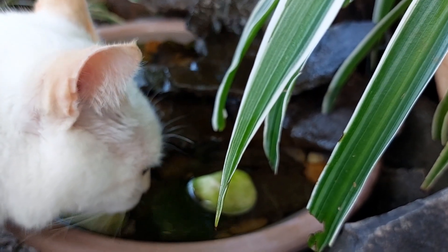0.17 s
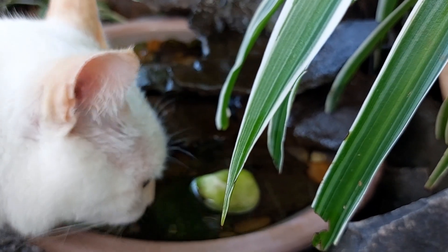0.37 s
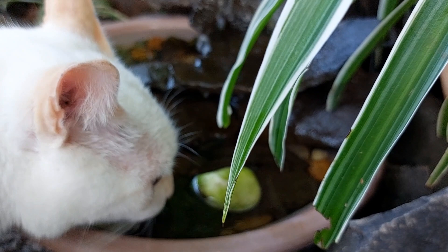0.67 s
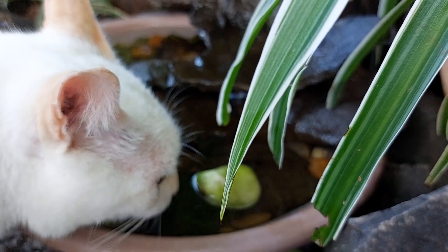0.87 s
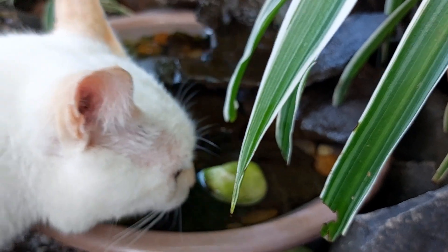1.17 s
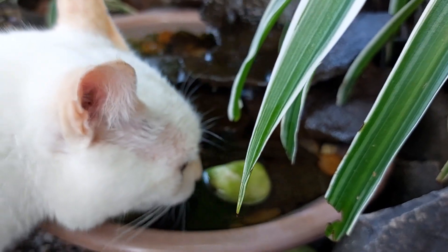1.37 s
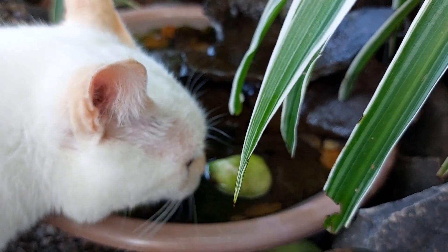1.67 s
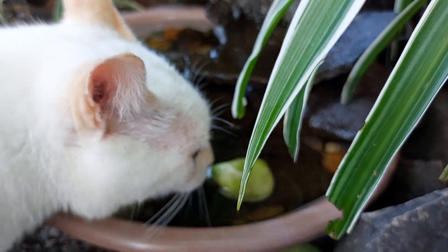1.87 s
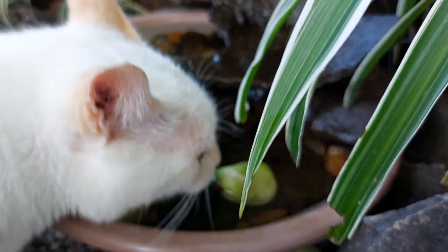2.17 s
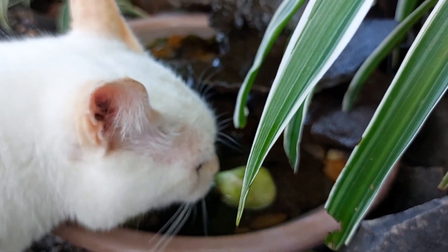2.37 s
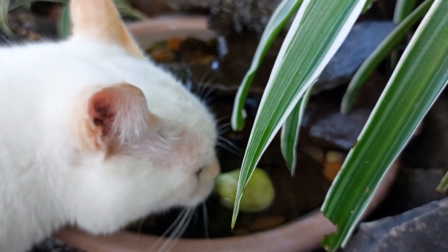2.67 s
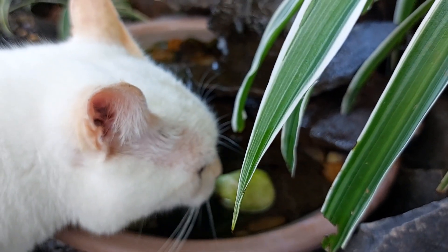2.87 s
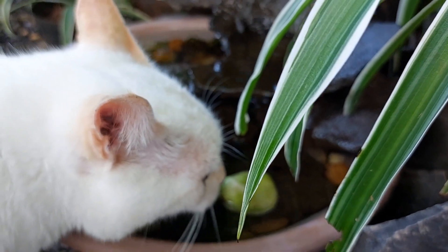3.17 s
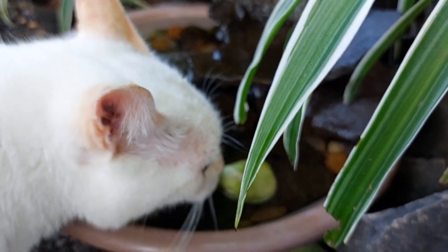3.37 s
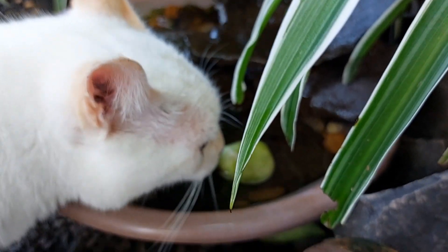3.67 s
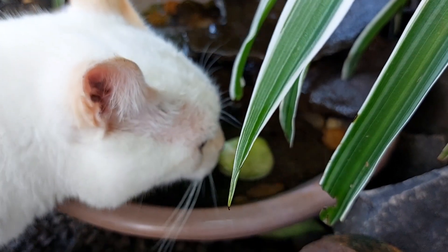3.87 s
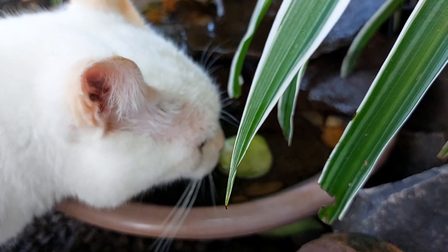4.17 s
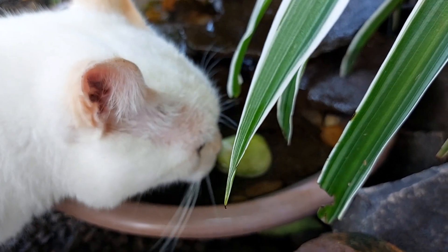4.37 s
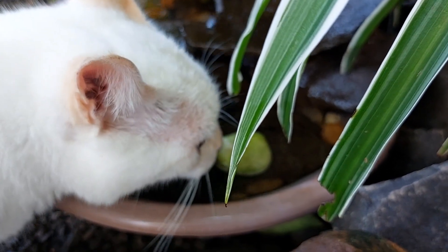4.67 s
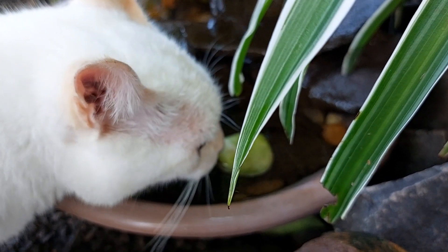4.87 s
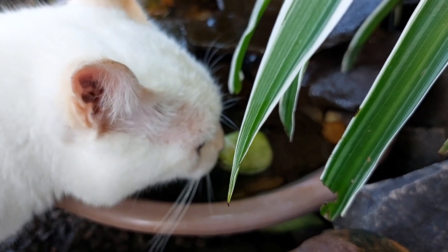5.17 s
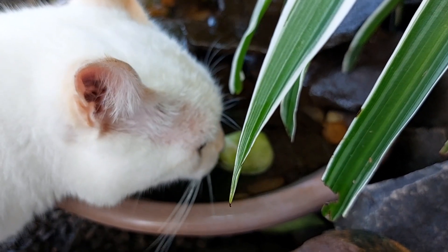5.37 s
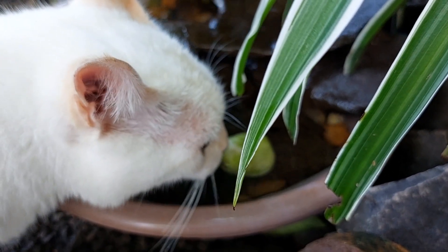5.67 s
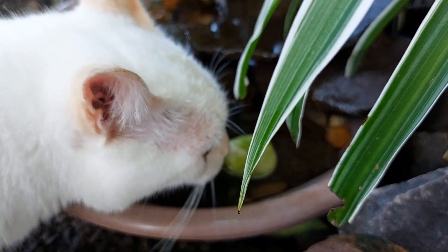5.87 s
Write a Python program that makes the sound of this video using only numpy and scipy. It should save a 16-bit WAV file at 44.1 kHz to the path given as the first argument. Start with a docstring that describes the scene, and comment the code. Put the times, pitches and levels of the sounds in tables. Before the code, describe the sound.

A cat drinks from a small garden pond, close to the right of a hand-held stereo microphone. Its tongue makes irregular, high wet clicks and tiny bubble pops, with one larger drip early on and soft smacks later. A bird faintly repeats a falling whistle. The microphone is bumped softly a few times past the middle. Distant traffic rumbles throughout, with tyres and an engine swelling near the end.

```python
"""A cat laps at a garden pond, close to the right of a hand-held stereo microphone; far traffic rumbles.
From the start each touch of the tongue pops small bubbles and spits spray; birds twitter faintly.
From 0.4 s one bird repeats a falling whistle. At 1.3 s a large drop falls back; at 1.9 s tyres hum past.
From 2.8 s come wet smacks, later dull knocks too. The casing is bumped around 3.5 s and at 4.7 s.
Tyre roar and an engine swell to their peak near 5.4 s."""
import sys
import numpy as np
from scipy import signal
from scipy.io import wavfile
from scipy.ndimage import uniform_filter1d

SR = 44100
rng = np.random.default_rng(int(sys.argv[2]) if len(sys.argv) > 2 else 0)


def file_out(sig):
    """Save sig as 16-bit WAV at sys.argv[1]."""
    # one column per channel
    cols = np.atleast_2d(sig).T
    # limit, then scale
    lim = np.clip(cols, -1, 1)
    pcm = np.round(lim * 32767).astype(np.int16)
    wavfile.write(sys.argv[1], SR, pcm)


N = 264952


def click(db, hz, spray_db, plop_db):
    """A bubble rings, rising slightly, with a snap, spray and a low plop; a wet tail follows."""
    t, white = np.arange(2600) / SR, rng.standard_normal(2600)
    onset = 1 - np.exp(-(t / 0.0006) ** 2)
    ring_t60_s = 0.004 + 0.02 * (2200 / hz) ** 3
    glide = 1 + 0.06 * np.minimum(t / ring_t60_s, 1)
    bubble = np.sin(2 * np.pi * hz * t * glide) * decay(t, ring_t60_s)
    wet = band(white, min(hz * 0.85, 13000), min(hz * 1.12, 15600))
    snap, tail = 0.32 * decay(t, 0.009), amp(-29) * decay(t, 0.07)
    hue = rng.uniform(0.85, 1.12)
    spray = band(white, 11500 * hue, 14500 * hue) + amp(3) * band(white, 4800 * hue, 7770 * hue)
    spray *= amp(spray_db) * decay(t, 0.011)
    plop = 0.18 * amp(plop_db + 1) * band(white, 790, 5100) * decay(t, 0.065)
    return amp(db) * onset * (1.73 * bubble + wet * (snap + tail) + spray + plop)


# tongue clicks: t/s, level/dB, bubble f/Hz, spray gain/dB, plop gain/dB
CLICKS = [(0.201, -28, 15200, -28.5, -28), (0.227, -25, 7180, -50, -32), (0.471, -43.5, 9600, -5.5, -30),
          (0.658, -47.5, 8100, -20, -20.5), (0.695, -36, 8600, -29, -36), (0.7055, -31, 5240, -9.5, -16),
          (0.7969, -26, 5880, -18, -14.5), (0.8677, -28.5, 7040, -22, -19), (0.9036, -41, 8400, -15, -14),
          (1.133, -51, 8100, -7, -26), (1.3447, -47, 3180, 12.5, 6), (1.368, -44, 7600, -16, -30),
          (1.419, -43, 6850, -9, -26), (1.482, -51.5, 6260, 1, -26), (1.729, -39, 14400, -32, -30),
          (2.0347, -38.5, 13700, -20, -19), (2.042, -30.5, 4560, -10, -34), (2.099, -43, 13100, -7, -22),
          (2.1226, -35.5, 8930, -18, -37), (2.154, -38.5, 9700, -19, -32), (2.182, -44, 13000, -24, -28),
          (2.194, -27.5, 14300, -45, -18), (2.271, -42.5, 2720, 0.5, 10), (2.3551, -43.5, 8100, -20, -29),
          (2.413, -46, 8060, -15, -31), (2.436, -39, 11500, -14, -25), (2.6397, -35, 3180, -9, -6),
          (2.73, -49.5, 5500, 5.5, -23), (2.826, -40, 7500, -23, -22), (2.9947, -36, 5160, -10.5, -10),
          (3.046, -42, 6750, -19, 0.5), (3.0967, -36, 8200, -16, -3), (3.104, -39, 5460, -13, -27),
          (3.1682, -36, 6060, -27, -25), (3.3266, -34.5, 12700, -14, -26), (3.3487, -34.5, 12500, -29, -33),
          (3.3753, -36, 2930, 1, 12.5), (3.397, -42, 8040, -13, -22), (3.4285, -33.5, 12200, -27, -12),
          (3.526, -44, 5400, -11, -24), (3.547, -39, 11900, -23, -33), (3.5563, -37, 13600, -23, -32),
          (3.6484, -41.5, 4000, -0.5, -24), (3.7188, -35.5, 6600, -29, -37),
          (3.809, -28.5, 5100, -8.5, -47), (3.8242, -31.5, 14500, -24, -45), (3.939, -40.5, 7050, -12, -28),
          (3.998, -55, 1760, 3, 16), (4.016, -39, 6860, -17, -30), (4.0928, -46, 3150, 7, 11),
          (4.145, -48, 7700, -19, -30), (4.208, -37, 7100, -21, -8), (4.216, -38.5, 7900, -22, -30),
          (4.3586, -31, 7240, -20, -14), (4.377, -31.5, 6740, -6.5, -10), (4.39, -31, 6500, -23, -27),
          (4.467, -42, 6900, -29, -20), (4.4754, -31.5, 6600, -31, -13), (4.495, -53, 5160, -1, -7),
          (4.53, -42, 4440, -7, 7), (4.5486, -33.5, 6800, -24, -22), (4.633, -34.5, 7260, -30, -25),
          (4.6404, -40.5, 3140, -4, 14.5), (4.969, -37, 7170, -13, -30), (5.1123, -22.5, 6200, -40, -36),
          (5.1131, -27.5, 3870, -22, -4), (5.188, -42, 14800, -29, -30), (5.2729, -38, 7900, -11.5, 1),
          (5.3746, -41, 6760, -28, 7), (5.5269, -35, 7300, -18, -29), (5.535, -35, 13400, -23, -33),
          (5.5615, -40.5, 4300, -5, -23), (5.7014, -26, 4180, -23.5, -11),
          (5.7026, -24.5, 6660, -38, -11.5), (5.7415, -29, 13400, -31, -11), (5.8949, -43, 13600, -5, -30),
          (5.894, -33.5, 4370, -16, -15), (5.9473, -43, 12400, -8, -24), (5.9825, -43.5, 2900, -15, 14)]
# click balance: bubble f/Hz, left-right/dB
CLICK_PAN = [(2000, -4), (5500, -10), (9500, -22), (13000, -17.5)]
def tongue():
    """Each touch pops a bubble; higher ones sound further right, those near 9.5 kHz furthest."""
    out = np.zeros((2, N))
    for start_s, db, hz, spray_db, plop_db in CLICKS:
        add(out, start_s, pan(click(db, hz, spray_db, plop_db), at_hz(CLICK_PAN, hz), lag_samples=-4))
    return out


# wet smacks and dull knocks: t/s, level/dB, f/Hz, t60/s
SMACKS_AND_KNOCKS = [(2.822, -51, 2550, 0.13), (2.838, -54, 2870, 0.074), (3.006, -53, 2200, 0.095),
                     (3.094, -54, 2720, 0.28), (3.346, -53, 710, 0.11), (3.369, -45.5, 1900, 0.15),
                     (4.3, -54, 680, 0.14), (4.595, -51, 810, 0.16), (4.742, -49.5, 1000, 0.089),
                     (5.114, -44.5, 3000, 0.14), (5.622, -49, 690, 0.11)]
def smacks_and_knocks():
    """Wet smacks and dull knocks: short bursts of band-limited noise."""
    out, t = np.zeros(N), np.arange(4000) / SR
    onset = np.minimum(t / 0.001, 1)
    for start_s, db, hz, t60_s in SMACKS_AND_KNOCKS:
        burst = band(rng.standard_normal(len(t)), hz * 0.91, hz * 1.25)
        add(out, start_s, amp(db) * onset * decay(t, t60_s) * burst)
    return pan(out, -2.5, lag_samples=-4)


# bubbles of one drop: t/s, length/s, first f/Hz, last f/Hz, level/dB
DRIP_BUBBLES = [(1.3443, 0.0045, 2300, 2200, -23.5), (1.3465, 0.012, 2080, 2200, -32),
                (1.357, 0.026, 2050, 3000, -55)]
def drip():
    """A large drop falls back: a sharp bubble, a held one, a faint one that flicks upward."""
    out = np.zeros(N)
    for start_s, length_s, first_hz, last_hz, db in DRIP_BUBBLES:
        u = progress(length_s)
        hz = first_hz + (last_hz - first_hz) * u
        add(out, start_s, amp(db) * np.sin(np.pi * np.sqrt(u)) * np.sin(phase(hz)))
    return pan(out, -2, lag_samples=-4)


def droplets(level, lo_hz, hi_hz, per_s, spread_db, t60_s):
    """Tiny bubbles of random pitch and strength ring briefly."""
    pops = amp(spread_db * np.minimum(rng.exponential(1, N), 3)) * (rng.random(N) < per_s / SR)
    pitch_index = rng.integers(0, 12, N)
    out, t = np.zeros(N), np.arange(400) / SR
    for k, hz in enumerate(np.geomspace(lo_hz, hi_hz, 12)):
        ring = np.sin(2 * np.pi * hz * t) * np.minimum(t * hz / 4, 1) ** 2 * decay(t, t60_s)
        out += signal.oaconvolve(pops * (pitch_index == k), ring)[:N]
    return pan(unit_rms(out) * level, -13)


# wet fizz: t/s, level/dB
FIZZ_LEVEL = [(0.0, -75.5), (0.52, -68), (1.15, -69), (1.55, -65), (1.87, -66), (2.29, -64.5), (2.5, -67),
              (2.81, -62.5), (3.29, -65.5), (3.6, -62.5), (4.16, -64), (4.45, -57.5), (4.72, -68),
              (5.27, -62.5), (6.01, -61.5)]
# fizz spectra, mid and top: f/Hz, level/dB
FIZZ_MID = [(3500, 3.5), (5000, 6.5), (7000, 8), (8500, 6), (11000, -45), (13000, -58)]
FIZZ_TOP = [(8000, -34), (11000, -21.5), (13000, -21), (15500, -24.5), (15750, -62)]
# wet swishes: t/s, length/s, top level/dB, mid level/dB
SWISHES = [(1.337, 0.17, -63, -59), (2.097, 0.091, -60.5, -65), (2.637, 0.07, -61, -58),
           (3.342, 0.14, -62, -59), (3.445, 0.11, -64, -63), (3.566, 0.1, -56, -56.5),
           (3.846, 0.2, -61, -58.5), (4.202, 0.059, -66, -74), (4.335, 0.083, -72, -49.5),
           (4.487, 0.037, -57, -74), (4.71, 0.074, -61, -59), (5.517, 0.068, -61, -72)]
def fizz():
    """Wet fur and tongue hiss in two bands, grainy with droplets, swelling in each swish."""
    swishes = np.zeros((2, N))
    for start_s, length_s, top_db, mid_db in SWISHES:
        swell = np.interp(progress(length_s), [0, 0.2, 0.4, 1], [0, 1, 1, 0])
        add(swishes, start_s, amp([[top_db], [mid_db]]) * swell)
    top_swish, mid_swish = swishes
    level_db = curves(FIZZ_LEVEL)[0]
    mid, top = amp(level_db), amp(-71 + 0.51 * (level_db + 65.5))
    hiss = np.hypot(mid, mid_swish) * noise(FIZZ_MID, 256, patchy_db=2.5, flicker_db=3)
    hiss += np.hypot(top, 1.33 * top_swish) * noise(FIZZ_TOP, 1024, patchy_db=2.9, flicker_db=2.2)
    crackle_level = 0.6 * np.hypot(0.6 * top, top_swish)
    crackle = droplets(crackle_level, 9000, 14500, per_s=200, spread_db=4.5, t60_s=0.003)
    ticks = droplets(0.24 * mid, 6400, 8200, per_s=18, spread_db=3.5, t60_s=0.006)
    return hiss + crackle + ticks


# casing bumps: t/s, level/dB, f/Hz
BUMPS = [(3.453, -39, 208), (3.482, -31, 365), (3.502, -38, 208), (3.581, -28, 310), (3.597, -32.5, 244),
         (3.619, -33.5, 235), (3.646, -43, 190), (4.747, -33.5, 230)]
def bumps():
    """Soft knocks on the casing: a few damped cycles, each with a short scuff."""
    out, t = np.zeros(N), np.arange(2000) / SR
    for start_s, db, hz in BUMPS:
        knock = 0.99 * t * hz * np.exp(-1.1 * t * hz) * np.sin(2 * np.pi * hz * t)
        scuff = band(rng.standard_normal(len(t)), 170, 475) * t / 0.01 * np.exp(-t / 0.012)
        add(out, start_s, amp(db) * (knock + amp(-11) * scuff))
    return pan(out, -20.5)


# bird whistles: t/s, length/s, first f/Hz, last f/Hz, level/dB
WHISTLES = [(0.355, 0.168, 6670, 4405, -54), (1.495, 0.16, 7330, 4470, -53.5),
            (2.674, 0.175, 7140, 4470, -52.5), (4.443, 0.15, 6320, 4300, -58),
            (5.689, 0.12, 5870, 4356, -51)]
def whistles(bend=1.8, wobble_hz=80):
    """A raspy tone slides down fast, then more slowly, and echoes in the garden."""
    out = np.zeros((2, N))
    for start_s, length_s, first_hz, last_hz, db in WHISTLES:
        u = progress(length_s)
        fall = (1 - np.exp(-bend * u)) / (1 - np.exp(-bend))
        hz = first_hz + (last_hz - first_hz) * fall + wobble_hz * jitter(len(u), 120)
        swell_db = -14 * (1 - u / 0.53).clip(0) ** 1.8 - 2 * u ** 3
        swell = amp(db + swell_db) * signal.windows.tukey(len(u), 0.2)
        rasp = 1 + 0.3 * jitter(len(u), 60)
        add(out, start_s, pan(swell * rasp * np.sin(phase(hz)), -10))
    return 0.65 * out + amp(0.5) * garden_echoes(out, t60_s=0.22)


# far birds: t/s, length/s, first f/Hz, last f/Hz, width/Hz, level/dB
TWITTER = [(0, 0.59, 6140, 6270, 500, -71), (0.546, 0.26, 4870, 4860, 700, -66),
           (2.111, 0.25, 4390, 3950, 400, -65.5), (4.228, 0.19, 3930, 3225, 1200, -54),
           (4.564, 0.8, 4510, 4360, 600, -67), (5.102, 0.65, 4305, 4200, 650, -60)]
def twitter():
    """Far calls, blurred by the garden: gliding tones smeared into bands."""
    out = np.zeros((2, N))
    for start_s, length_s, first_hz, last_hz, width_hz, db in TWITTER:
        n = round(length_s * SR)
        pole = np.exp(-np.pi * width_hz / SR)
        blur = signal.lfilter([1], [1, -2 * pole, pole ** 2], complex_noise(2, n))
        call = unit_rms((blur * np.exp(1j * phase(np.linspace(first_hz, last_hz, n)))).real)
        add(out, start_s, amp(db) * call * signal.windows.tukey(n, 0.4) * amp([[-3], [3]]))
    return out


# traffic swells: t/s, rumble level/dB, tyre roar level/dB
TRAFFIC_LEVELS = [(0.0, -41, -75), (0.13, -47, -70.5), (1.64, -37.5, -64.5), (1.94, -42, -57),
                  (2.83, -43, -65), (3.8, -39, -65.5), (4.28, -46, -59), (4.68, -43, -54),
                  (5.12, -45.5, -53.5), (5.39, -40, -50.5), (6.01, -43, -58.5)]
# road noise spectra, low to high: f/Hz, level/dB
RUMBLE = [(12, -79), (30, -21), (44, -4.5), (76, -0.5), (124, -5.5), (156, -15), (200, -11.5), (260, -32),
          (440, -120)]
DRONE = [(76, -52), (130, -6), (156, -10), (248, 1.5), (335, -8), (383, -9.5), (417, -21.5), (550, -19.5),
         (720, -33), (1210, -120)]
ROAR = [(240, -5.5), (400, -14), (482, -3), (625, -10), (850, -7.5), (1100, -7.5), (1380, -13), (1600, -8),
        (2080, -15.5), (3520, -120)]
UPPER_ROAR = [(760, -9), (1300, 2.5), (1420, -20), (1720, -8), (2070, 0.5), (2320, -2.5), (4000, -10.5),
              (5200, -10), (8800, -120)]
def traffic(nearing_db_per_s=3):
    """Four layers of far road noise; the highest also grows as a vehicle nears."""
    rumble_db, roar_db = curves(TRAFFIC_LEVELS)
    drone_db = -52.5 + 0.65 * (rumble_db + 41.5) + 0.28 * (roar_db + 58)
    upper_db = -76 + 0.43 * (roar_db + 55) + nearing_db_per_s * np.arange(N) / SR
    return (amp(rumble_db - 1.5) * noise(RUMBLE, 2048, patchy_db=1.2, flicker_db=1)
            + amp(drone_db) * noise(DRONE, 1024, patchy_db=2.2, flicker_db=0.16)
            + amp(roar_db) * noise(ROAR, 1024, patchy_db=2.6, flicker_db=1)
            + amp(upper_db) * noise(UPPER_ROAR, 512, patchy_db=2.7, flicker_db=1))


# engine run: t/s, turn rate/Hz, nearness/dB
ENGINE_RUN = [(0, 43.5, -7), (1.6, 43.6, -2.5), (3.2, 42.79, -8), (4.3, 43.27, -5.5), (4.75, 43.47, 0),
              (5.1, 43.05, -0.5), (5.38, 42.9, 1.5), (5.7, 42.55, 0.5), (6.01, 43.17, -0.5)]
# engine harmonics: multiple of turn rate, level/dB
ENGINE_ORDERS = [(2, -55), (3, -51.5), (5, -60.5), (6, -60), (7, -63), (9, -59.5), (14, -66.5), (22, -69.5),
                 (25, -79), (30, -74), (34, -76), (44, -72.5)]
def engine(waver_db=4, drift_cycles=0.2):
    """Multiples of the turn rate waver separately; higher ones fade faster with distance."""
    hz, near_db = curves(ENGINE_RUN)
    out, knots = np.zeros(N), np.arange(0, N + 2500, 2500)
    for order, db in ENGINE_ORDERS:
        waver, drift = (np.interp(np.arange(N), knots, v) for v in rng.standard_normal((2, len(knots))))
        octaves = np.log2(order)
        level = amp(db + octaves * near_db + waver_db * waver)
        offset_cycles = drift_cycles * octaves * drift + rng.random()
        out += level * np.sin(order * phase(hz) + 2 * np.pi * offset_cycles)
    return np.sqrt(2) * out


# tyre hum: t/s, level/dB
HUM_LEVEL = [(0.6, -87), (0.95, -67), (1.3, -88), (1.65, -67), (1.9, -57.5), (2.15, -67), (2.45, -66.5),
             (2.85, -72), (3.1, -80), (6.01, -101)]
def tyre_hum():
    """Passing tyres hum in one narrow band, unrelated left and right."""
    return amp(curves(HUM_LEVEL)[0]) * np.sqrt(2) * band(rng.standard_normal((2, N)), 968, 1240)


# outdoor air spectrum: f/Hz, level/dB
AIR_SPECTRUM = [(180, -28), (300, -12.5), (528, 1), (885, -6.5), (1120, -5), (1430, -7), (2790, -9.5),
                (3460, -15.5), (5160, -21.5), (6300, -11.5), (10600, -12.5), (15500, -18), (15750, -70)]
def air():
    """A faint, broad hiss."""
    return amp(-67.5) * noise(AIR_SPECTRUM, 512, patchy_db=3.5, flicker_db=0.4)


def garden_echoes(x, t60_s):
    """Sparse echoes of random sign from stones, walls and leaves, different in each channel."""
    taps = np.zeros((2, SR // 2))
    slots = np.arange(60, SR // 2 - 22, 22)
    delays = slots + rng.integers(0, 22, (2, len(slots)))
    np.put_along_axis(taps, delays, rng.choice([-1., 1.], delays.shape), 1)
    taps *= decay(np.arange(SR // 2) / SR, t60_s)
    return signal.fftconvolve(x, taps / np.linalg.norm(taps[0]), axes=1)[:, :N]


# stereo likeness: f/Hz, left-right correlation
NOISE_LIKENESS = [(60, 0.88), (180, 0.79), (550, 0.17), (1650, -0.27), (4970, 0.1), (15000, -0.11)]
# stereo balance: f/Hz, left-right/dB
NOISE_PAN = [(60, 0), (130, 3.5), (290, 5), (640, -3), (1410, -2), (3100, -1.5), (6820, -7), (10000, 1.5),
             (13000, -12.5)]
def noise(spectrum, fft_size, patchy_db, flicker_db):
    """Shaped stereo noise with drifting patches and a flicker shared by all bins."""
    hop, hz = fft_size // 4, np.fft.rfftfreq(fft_size, 1 / SR)
    grid = len(hz), N // hop + 5
    patches = uniform_filter1d(rng.standard_normal(grid), fft_size // 64, axis=0)
    patches = unit_rms(uniform_filter1d(patches, 12, axis=1))
    level_db = at_hz(spectrum, hz)[:, None] + patchy_db * patches + flicker_db * jitter(grid[1], 3)
    likeness, pan_db = at_hz(NOISE_LIKENESS, hz)[:, None], at_hz(NOISE_PAN, hz)[:, None]
    left, unrelated = complex_noise(2, *grid)
    right = likeness * left + np.sqrt(1 - likeness ** 2) * unrelated
    spectra = np.array([left * amp(level_db + pan_db / 2), right * amp(level_db - pan_db / 2)])
    x = signal.istft(spectra, nperseg=fft_size, noverlap=fft_size - hop)[1][:, :N]
    return x / np.sqrt(np.mean(x.mean(0) ** 2))


def amp(db):
    return 10 ** (np.asarray(db) / 20)


def decay(t, t60_s):
    return amp(-60 * t / t60_s)


def phase(hz):
    return 2 * np.pi * np.cumsum(hz) / SR


def progress(length_s):
    return np.linspace(0, 1, round(length_s * SR))


def unit_rms(x):
    return x / np.sqrt(np.mean(x ** 2) + 1e-20)


def jitter(n, smoothing):
    return unit_rms(uniform_filter1d(rng.standard_normal(n), smoothing))


def complex_noise(*shape):
    return rng.standard_normal(shape) + 1j * rng.standard_normal(shape)


def band(x, lo_hz, hi_hz):
    """Band-pass, scaled to unit rms."""
    return unit_rms(signal.sosfilt(signal.butter(2, [lo_hz, hi_hz], "band", fs=SR, output="sos"), x))


def at_hz(table, hz):
    table_hz, values = np.transpose(table)
    return np.interp(np.log(hz + 1), np.log(table_hz + 1), values)


def curves(table):
    times_s, *columns = np.transpose(table)
    return [np.interp(np.arange(N) / SR, times_s, column) for column in columns]


def add(mix, start_s, sound):
    part = mix[..., round(start_s * SR):][..., :sound.shape[-1]]
    part += sound[..., :part.shape[-1]]


def pan(x, pan_db, lag_samples=14):
    """Mono to stereo; level and lag are left relative to right."""
    return np.array([np.roll(x, lag_samples), x]) * amp([[pan_db / 2], [-pan_db / 2]])


def scene():
    """Close sounds with short echoes, then birds, road and air."""
    direct = tongue() + smacks_and_knocks() + drip()
    close = direct + amp(-17) * garden_echoes(direct, t60_s=0.06) + fizz() + bumps()
    return close + whistles() + twitter() + traffic() + engine() + tyre_hum() + air()


def record(dry, low_cut_hz=37, high_cut_hz=16350):
    """The microphone drops the deepest bass, the recorder the highest treble."""
    thinned = signal.sosfilt(signal.butter(4, low_cut_hz, "high", fs=SR, output="sos"), dry)
    low_pass = signal.firwin(511, high_cut_hz, window=("kaiser", 9), fs=SR)
    return signal.oaconvolve(thinned, low_pass[None], "same")


dry = scene()
out = record(dry)
file_out(out)
```